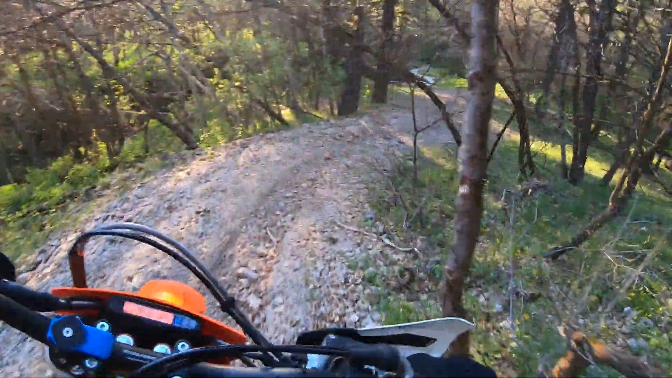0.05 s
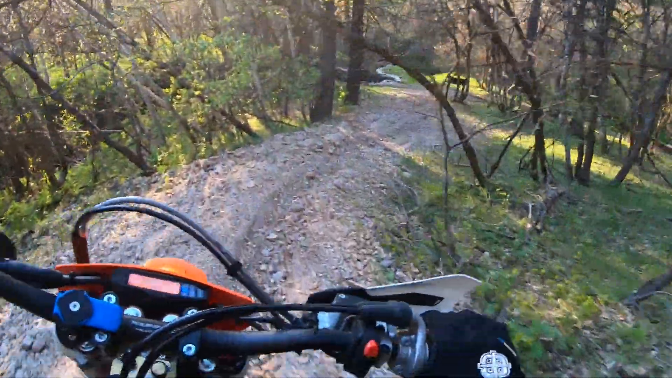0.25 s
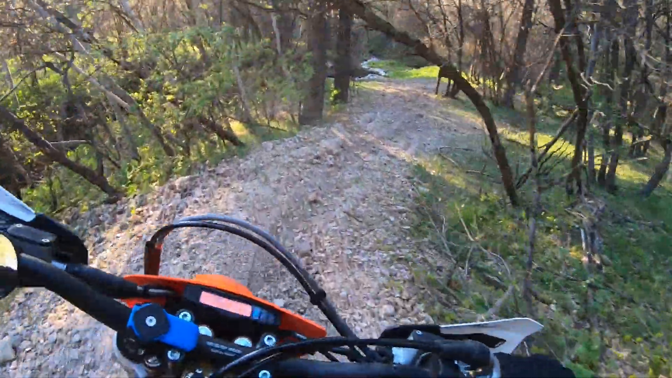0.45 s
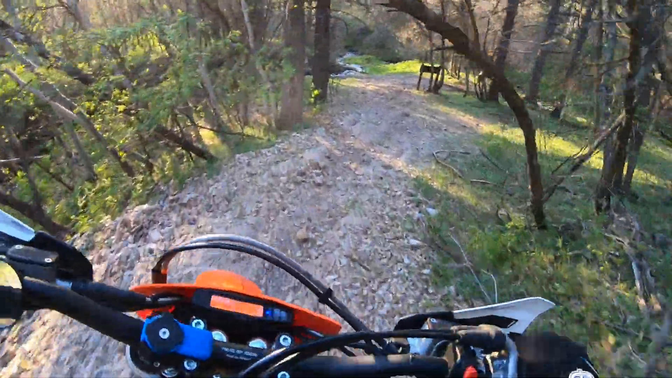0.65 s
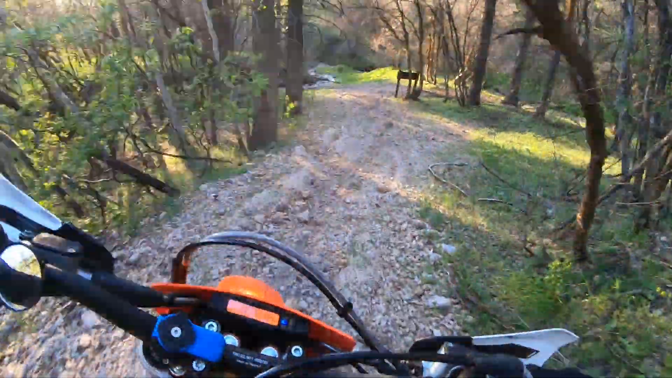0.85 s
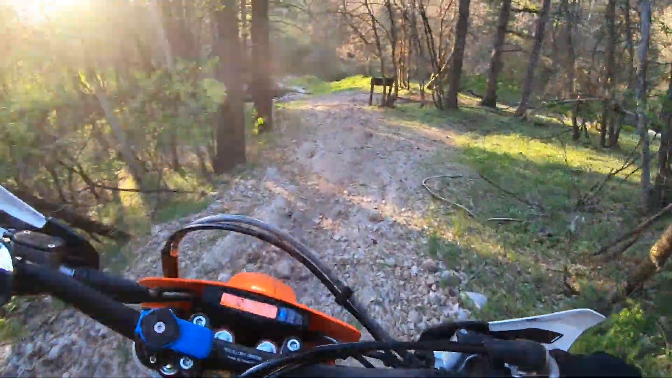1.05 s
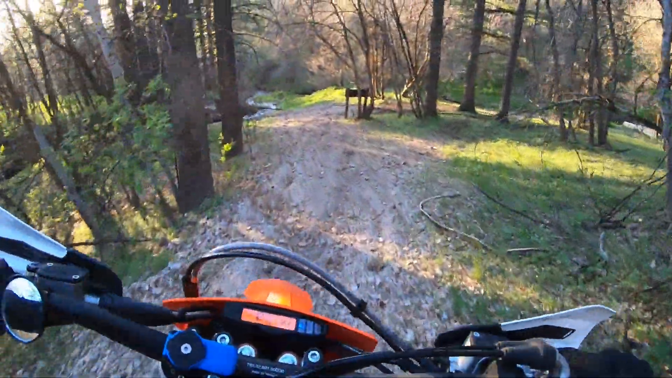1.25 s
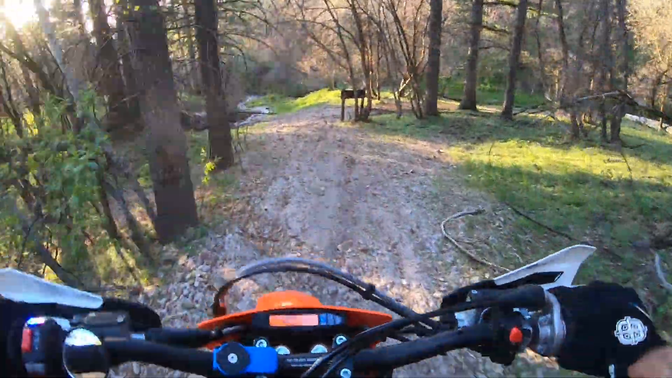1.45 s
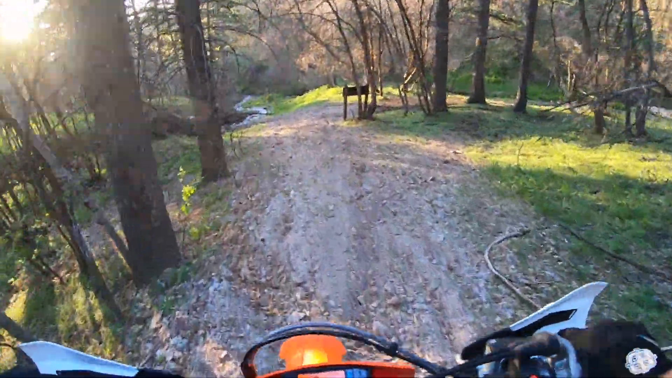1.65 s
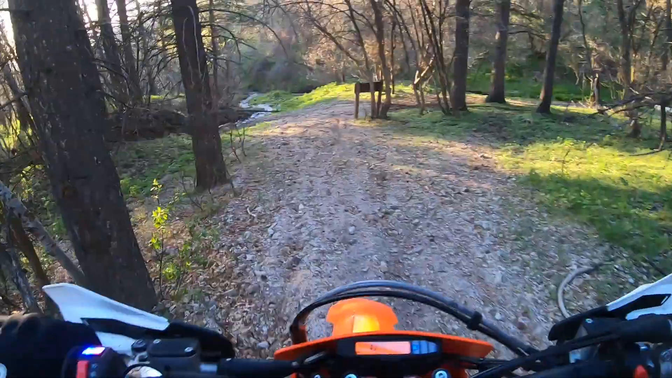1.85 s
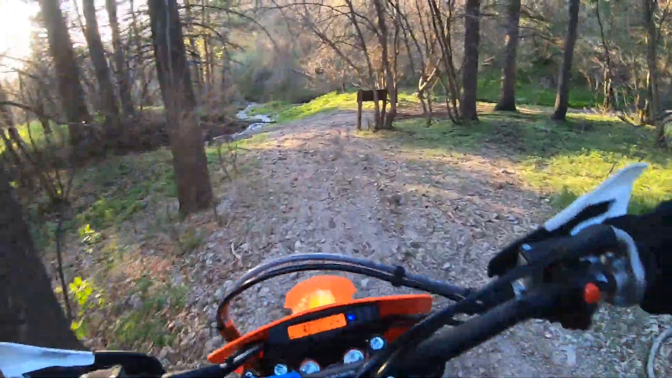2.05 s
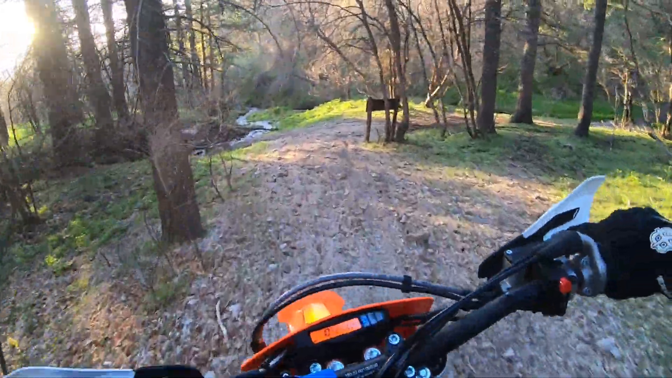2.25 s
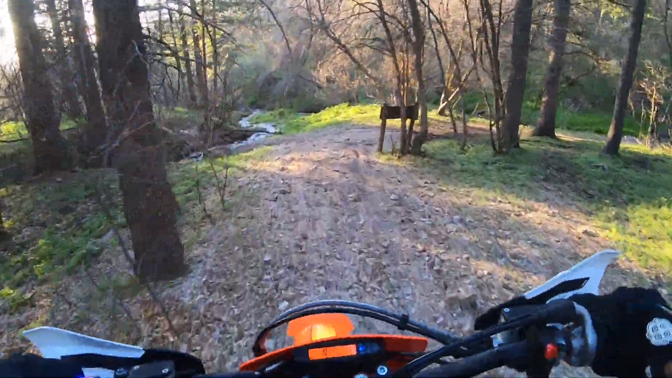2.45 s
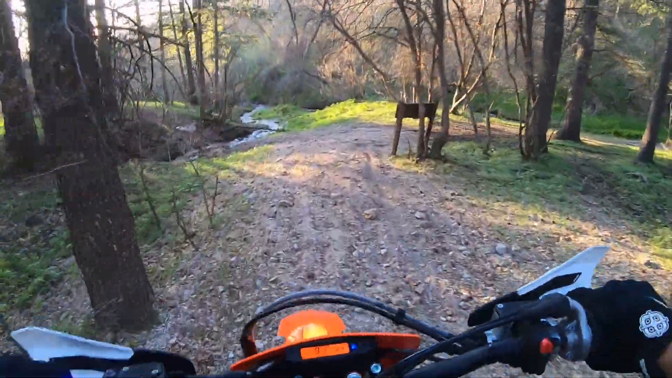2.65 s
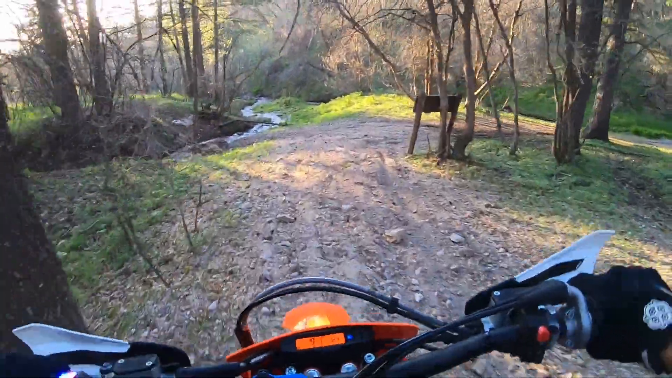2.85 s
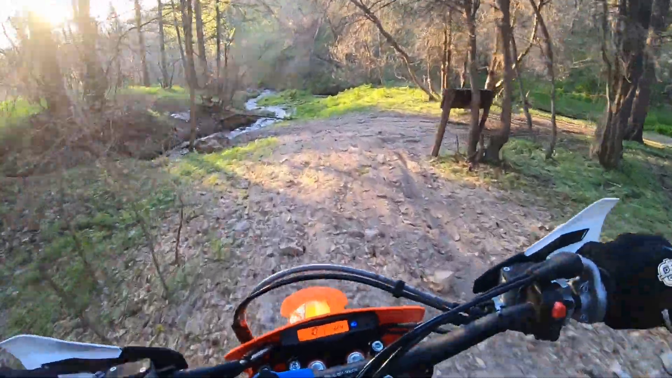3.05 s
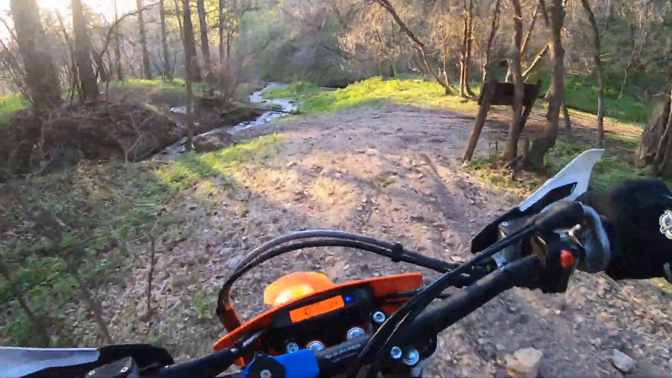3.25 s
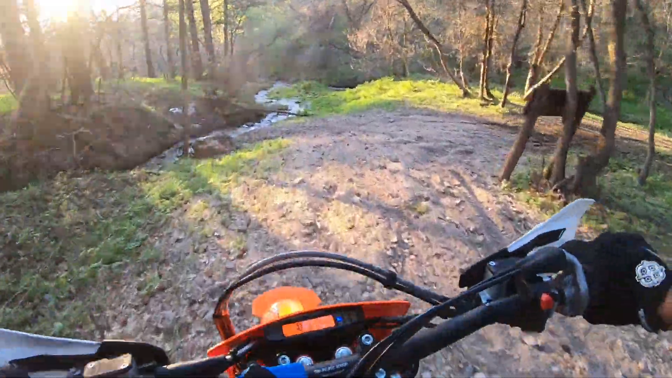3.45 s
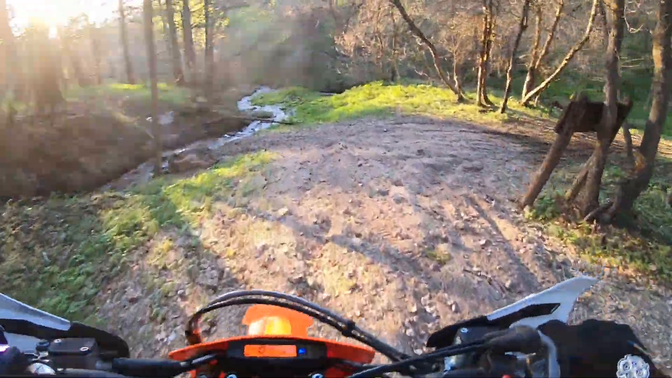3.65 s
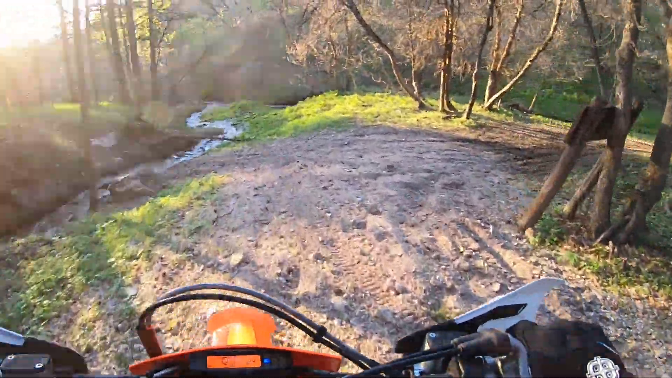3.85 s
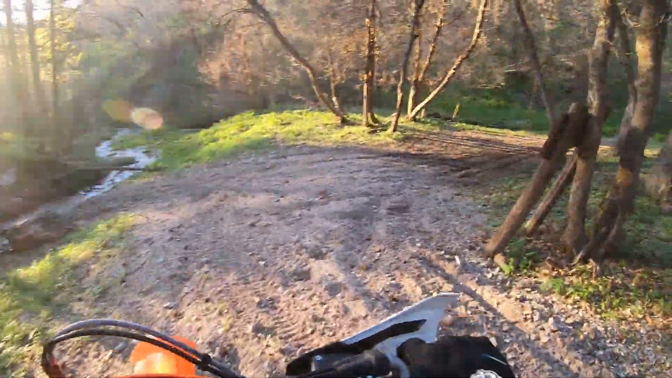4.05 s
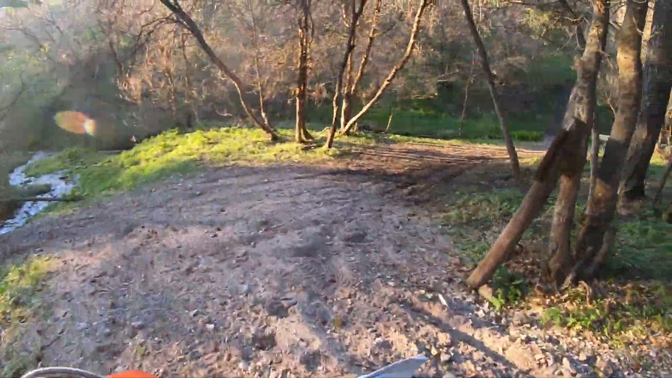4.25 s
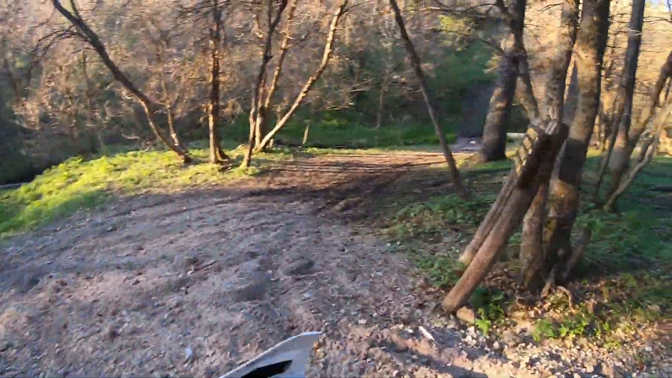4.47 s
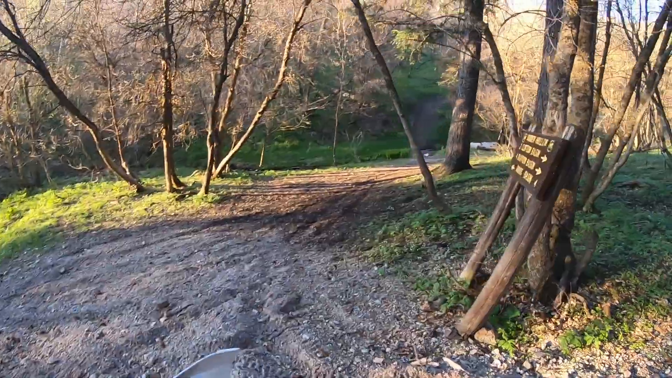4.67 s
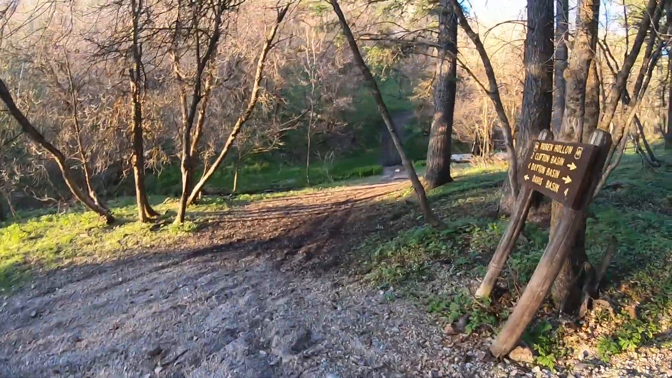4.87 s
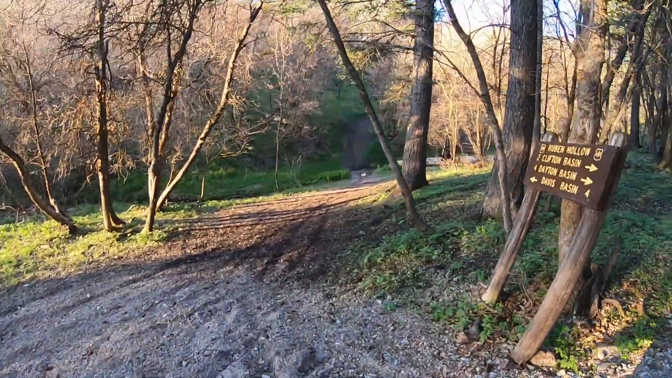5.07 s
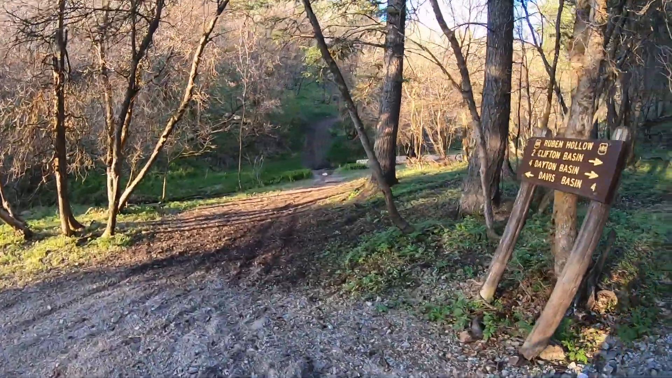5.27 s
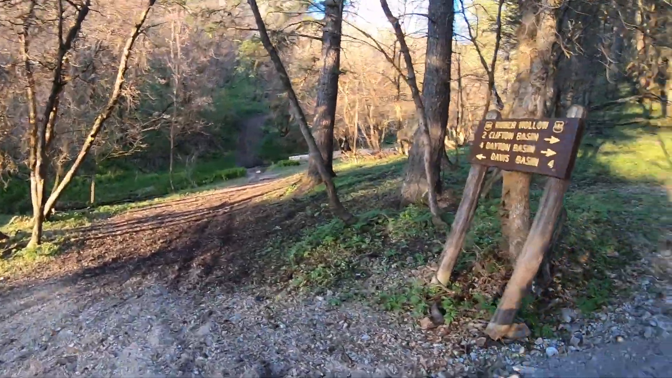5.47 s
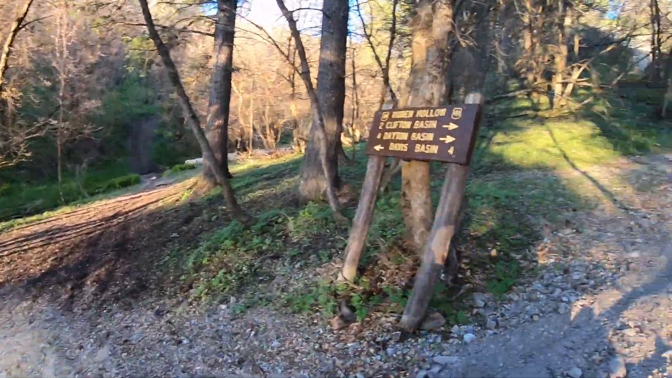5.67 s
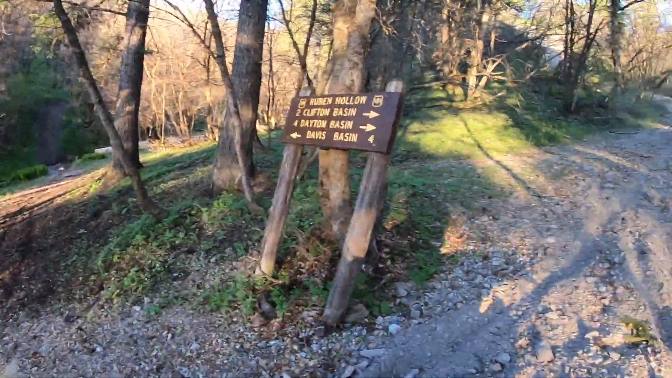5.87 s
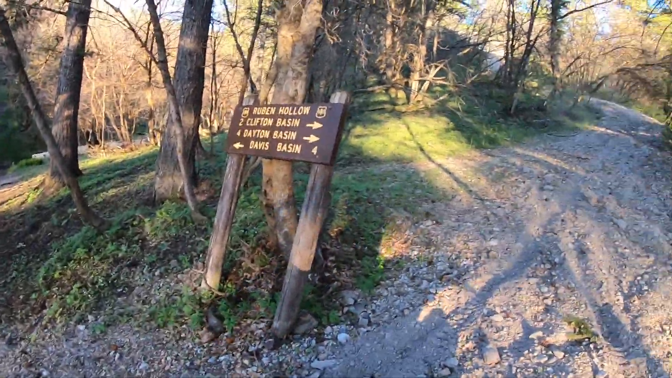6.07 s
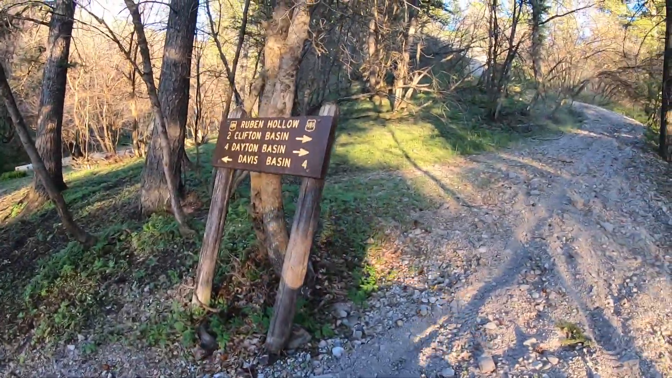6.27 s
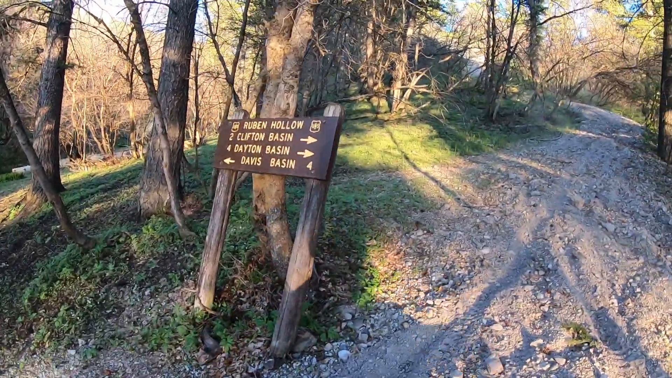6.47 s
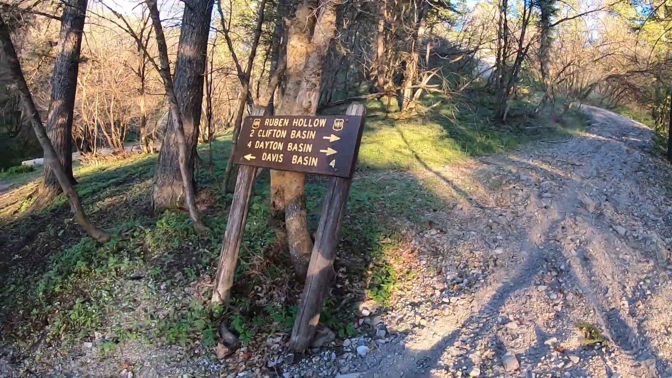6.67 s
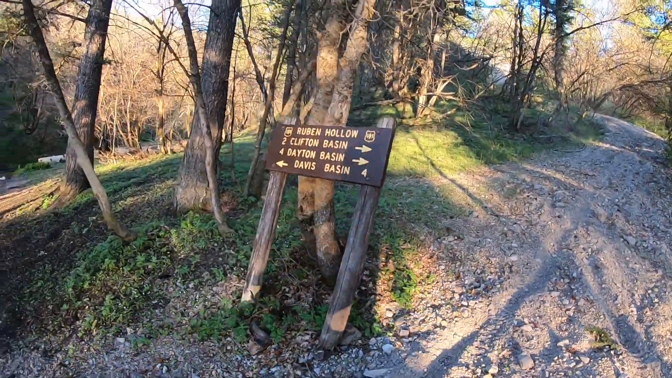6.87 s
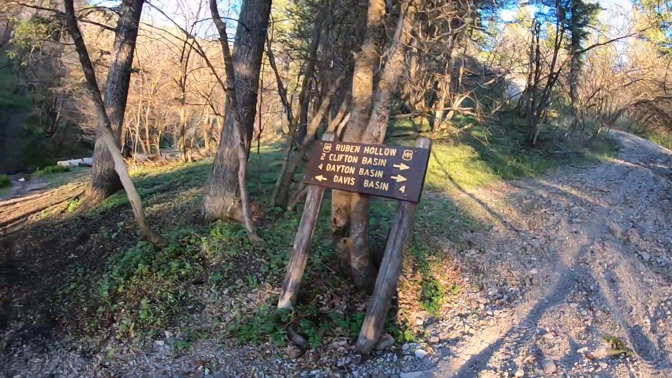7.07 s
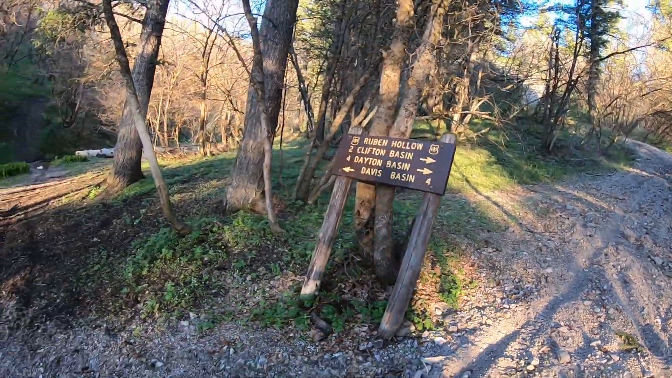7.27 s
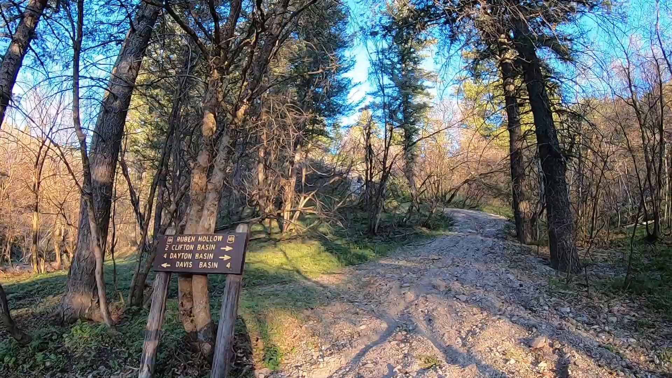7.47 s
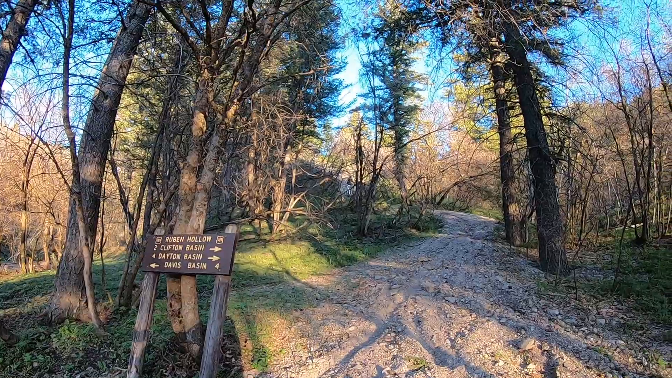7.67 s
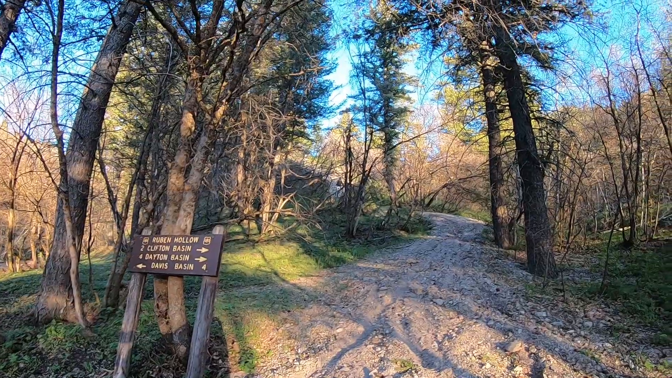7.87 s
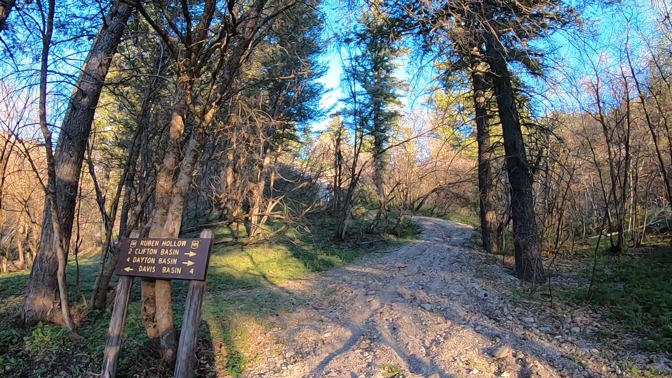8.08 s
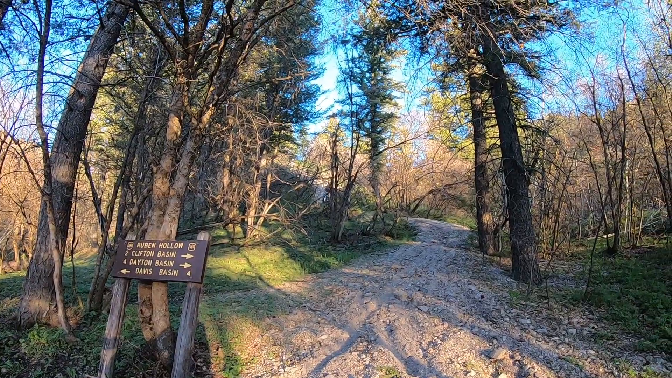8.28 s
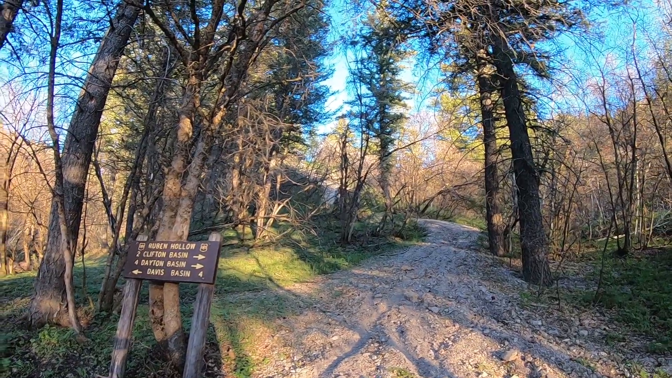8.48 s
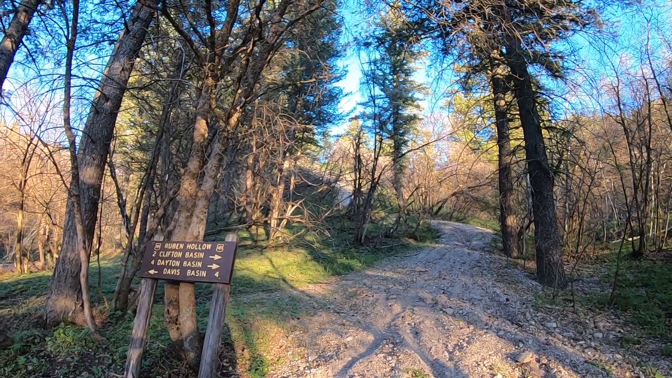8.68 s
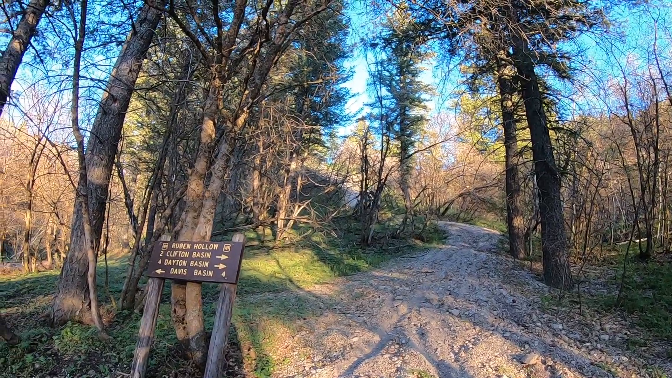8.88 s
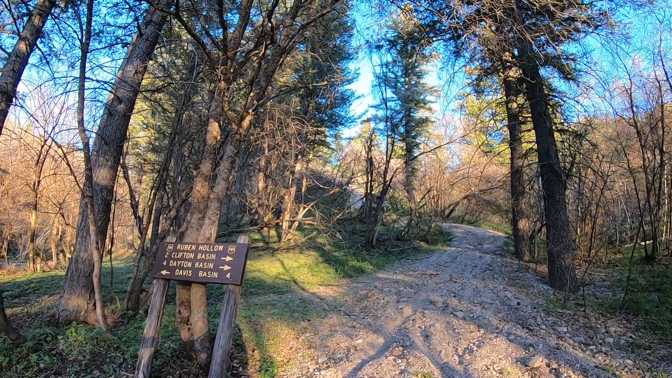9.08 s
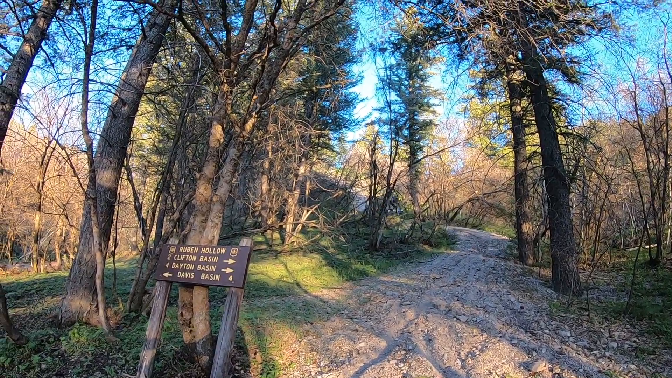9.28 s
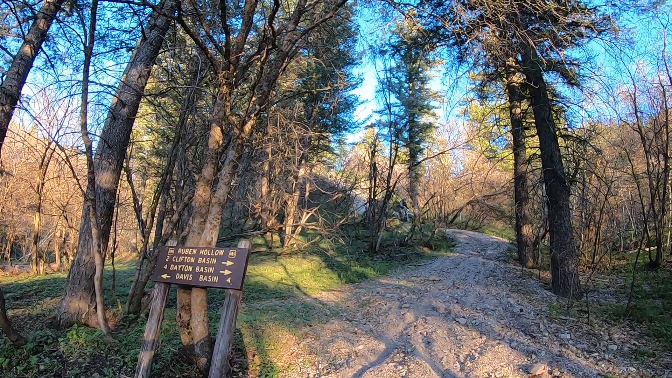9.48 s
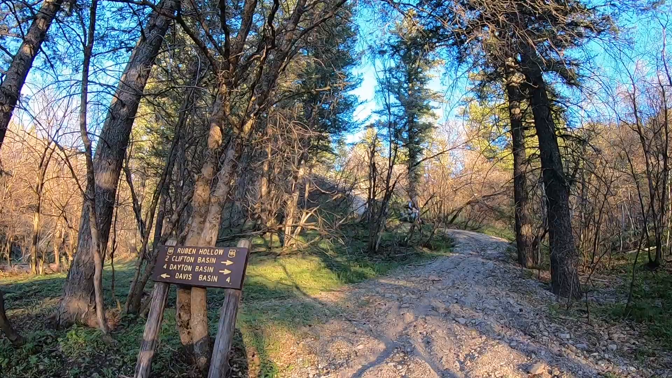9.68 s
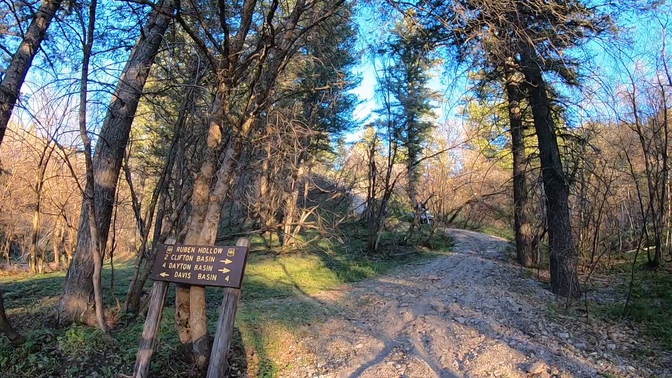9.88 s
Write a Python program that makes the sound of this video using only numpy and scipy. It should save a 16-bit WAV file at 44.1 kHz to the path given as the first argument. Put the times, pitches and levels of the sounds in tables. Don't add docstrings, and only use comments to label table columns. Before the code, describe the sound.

A single-cylinder four-stroke dirt bike heard from the rider's helmet, close and mono. The throttle is blipped repeatedly, thumps rising to hoarse barks and sagging to slow, popping chugs, while gravel crunches, gears whirr and stones knock the frame. It idles, revs sharply once more and slows. Then the sound opens to wide stereo outdoors: quiet, dull engine putter, hissing stream, tiny twig ticks and one hollow bump.

```python
import sys
import numpy as np
from scipy import signal
from scipy.fft import rfft, irfft, next_fast_len
from scipy.io import wavfile
from scipy.ndimage import uniform_filter1d

SR = 44100
rng = np.random.default_rng(int(sys.argv[2]) if len(sys.argv) > 2 else 0)


def inscribe(sig):
    pcm = np.round(np.clip(np.atleast_2d(sig).T, -1, 1) * 32767)
    wavfile.write(sys.argv[1], SR, pcm.astype(np.int16))


def field_ratio(decibels):
    return 10 ** (np.asarray(decibels, dtype=float) / 20)


N = 437913
TIME_S = np.arange(N) / SR
SWITCH_S = 7.4945


def in_time(rows):
    s, *columns = np.transpose(rows)
    return [np.interp(TIME_S, s, c) for c in columns]


def at_hz(points, hz):
    point_hz, point_db = np.transpose(points)
    return np.interp(np.log(hz), np.log(point_hz), point_db)


def swell(at_s, width_s):
    return np.exp(-((TIME_S - at_s) / width_s) ** 2)


def rms_one(x):
    return x / np.sqrt(np.mean(x ** 2) + 1e-20)


def noise():
    return rng.standard_normal(N)


def drift(rate_hz):
    r = np.exp(-80 * np.pi * rate_hz / SR)
    slow = signal.lfilter([1], [1, -2 * r, r * r], rng.standard_normal(N // 40 + 2002))[2000:]
    return np.interp(np.arange(N) / 40, np.arange(len(slow)), rms_one(slow))


def cut(x, hz, kind, order=2):
    return signal.sosfilt(signal.butter(order, hz, kind, fs=SR, output="sos"), x + 1e-18)


def ring(hits, hz, t60_s):
    r, w = field_ratio(-60 / (t60_s * SR)), 2 * np.pi * hz / SR
    return signal.lfilter([0, np.sin(w)], [1, -2 * r * np.cos(w), r * r], hits + 1e-18)


def late(x, delay_s):
    lag = max(int(delay_s * SR), 1)
    return np.concatenate([np.zeros(lag), x[:-lag]])


def clicks(s, level_db):
    out = np.zeros(N)
    out[np.clip((s * SR).astype(int), 0, N - 1)] = field_ratio(level_db)
    return out


def puff(train, hz):
    return cut(cut(train, hz, "low"), hz, "low") * SR / hz / 3


def pipe(pulse, trip_s, trips_db, dull_hz):
    out = pulse
    for trip_db in trips_db:
        pulse = cut(late(pulse, trip_s), dull_hz, "low")
        out = out + field_ratio(trip_db) * pulse
    return out


# hz, likeness (-1 to 1)
LIKENESS = [(60, 0.99), (170, 0.99), (460, 0.91), (1260, -0.11), (3470, 0.39), (9580, -0.48)]
# hz, left_minus_right_db
LEAN = [(60, -2.5), (210, 1), (760, -5.5), (2700, -4.5), (9580, -3.5)]


def banded_noise(spectrum, patchy_db, wide=False):
    size = next_fast_len(N, True)
    hz = np.maximum(np.arange(size // 2 + 1) * SR / size, 1)
    mid, side = rfft(rng.standard_normal((2, size))) * field_ratio(at_hz(spectrum, hz))
    if wide:
        alike = np.clip(at_hz(LIKENESS, hz), -1, 1)
        mid = np.sqrt(1 + alike) * mid + np.sqrt(1 - alike) * side * [[1], [-1]]
        mid = mid * field_ratio(at_hz(LEAN, hz) * np.array([[.5], [-.5]]))
    out, together, octave = 0, drift(3.0), np.log2(hz / 50)
    for k in range(9):
        band = irfft(mid * np.clip(1 - np.abs(octave - k), 0, 1), size)[..., :N]
        out = out + field_ratio(patchy_db * (together + drift(14))) * band
    return rms_one(out)


# s, level_db
STREAM = [(7.5, -37), (8.6, -37), (9.27, -37.5), (9.93, -35.5)]
# hz, density_db
WATER = [(60, -4), (130, -4), (323, -17), (910, -19), (1240, -17), (2140, -21.5), (3190, -24),
         (5120, -32.5), (8990, -31), (10000, -36.5), (13000, -64), (22000, -120)]


def stream():
    return field_ratio(in_time(STREAM)[0]) * banded_noise(WATER, patchy_db=0.82, wide=True)


def treble_air():
    air = cut(rng.standard_normal((2, N)), [9500, 13500], "band")
    return air + .2 * air[::-1]


# start_s, peak_db
FLICKS = [(0.0927, -60), (0.334, -48.5), (0.4813, -44.5), (0.8814, -56), (0.8967, -54.5), (1.0805, -57.5),
          (3.275, -48.5), (3.328, -56.5), (3.3643, -54.5), (4.0073, -66), (5.7414, -60), (6.1474, -57.5),
          (6.1857, -63), (6.363, -60), (6.4013, -67), (6.5116, -63)]


def grit_level():
    dust = field_ratio(-74.5 + 1.0 * (in_time(ROLL)[1] + 51.5) + 3.2 * drift(20))
    s, peak_db = np.transpose(FLICKS)
    fade = [1, -np.exp(-1 / (0.003 * SR))]
    return dust + signal.lfilter([1], fade, clicks(s, peak_db + 4.0) + 1e-18)


# centre_s, width_s, level_db
SIZZLE = [
    (.25, 0.57, -56.5),
    (4.48, .06, -63),
    (6.07, 0.055, -70),
    (7.0, 0.39, -59),
    (7.35, 0.11, -77),
]


def sizzle():
    level = sum(field_ratio(level_db) * swell(s, width_s) for s, width_s, level_db in SIZZLE)
    return level * field_ratio(1.5 * drift(25.0)) * rms_one(cut(noise(), [5500, 9500], "band"))


# centre_s, width_s, pitch_hz, level_db
CASE_WHIRR = [
    (8.1, .4, 1220, -61),
    (8.62, 0.17, 1620, -48),
    (9.5, 0.18, 1310, -50),
    (9.8, 0.16, 1400, -51.5),
    (9.75, 0.59, 3150, -53.5),
    (7.2, 0.29, 1100, -51),
]


def case_whirr():
    out = 0
    for s, width_s, hz, level_db in CASE_WHIRR:
        tone = rms_one(ring(ring(noise(), hz, 0.0064), hz, 0.0064))
        out = out + field_ratio(level_db + 3.7 * drift(12.0)) * swell(s, width_s) * tone
    return out


# s, drive_db (drive train speed), loose_db (loose stones under the tyres)
ROLL = [(0.0, -53.5, -42.5), (0.4, -46, -46), (0.95, -44, -44), (1.6, -43.5, -45.5), (2.7, -44, -49.5),
        (3.3, -40, -43), (3.6, -44, -41), (4.1, -42, -46.5), (4.56, -44, -49), (4.64, -38.5, -44.5),
        (4.85, -44, -50), (5.6, -49.5, -51.5), (6.1, -58, -45), (6.55, -49.5, -42.5), (6.9, -61, -49),
        (7.5, -45.5, -47.5)]


def rolling_levels():
    drive_db, loose_db = in_time(ROLL)
    revs = in_time(SPEED_CLOSE)[0] - 20
    return drive_db, loose_db, revs, 6 * swell(5.755, .022)


def strokes(s, sharpness_db):
    cycle = np.interp(TIME_S, s, np.arange(len(s)))
    slow, quick = np.cos(2 * np.pi * cycle), np.cos(4 * np.pi * (cycle - .1))
    return slow * sharpness_db[0] + quick * sharpness_db[1]


# hz, density_db
RUMBLE = [(40, -3.5), (150, 3.5), (300, 5.5), (520, -3), (700, -12), (1000, -11), (1300, -23.5),
          (2200, -48)]
# centre_s, width_s, crunch_db
SHOVES = [
    (.08, 0.22, 0),
    (.45, 0.044, 2.0),
    (1.65, 0.04, 5),
    (2.55, 0.082, -0.5),
    (7.2, .35, -5),
]


def tyre_rumble(loose_db, revs, rustle_db):
    level_db = -35 + 0.2459 * revs + 1.1 * rustle_db + 0.29 * (loose_db + 44.0)
    level_db = level_db + sum(db * swell(s, width_s) for s, width_s, db in SHOVES)
    return field_ratio(level_db + 6.0) * banded_noise(RUMBLE, patchy_db=.9)


def gear_whirr(s, drive_db, revs):
    teeth = noise() * field_ratio(strokes(s, (1.0, 3.0)) + 1.0 * drift(25))
    return field_ratio(drive_db + 0.45 * revs + 2.5) * rms_one(ring(ring(teeth, 1590, 0.0026), 1621, 0.021))


# hz, density_db
HISS = [(1120, -1.5), (1900, -1), (2040, -3), (2230, -4.5), (2730, -5), (3860, -9), (4440, -15),
        (5140, -16), (6380, -21.5), (7860, -19), (8610, -21.5), (10000, -54), (13000, -71), (22000, -120)]


def valve_hiss(s, hiss_db):
    throb_db = strokes(s, (2.0, 1.0)) * (0.5 + 1.0 * in_time(TAIL_PIPE)[0])
    hiss = banded_noise(HISS, patchy_db=1.43) * field_ratio(throb_db + 2.0 * np.tanh(drift(39.0)))
    return field_ratio(hiss_db + 3.5) * rms_one(hiss)


def gravel(drive_db, hiss_db, rustle_db):
    sizes = field_ratio(3.5 * np.minimum(rng.exponential(1, N), 4)) * rng.choice([-1, 1], N)
    born = rng.random(N) < 1200 * field_ratio(5.0 * np.tanh(drift(8))) / SR
    dealt = rng.integers(0, 10, N)
    grains = 0
    for k, hz in enumerate(np.geomspace(900, 4000, 10)):
        grains = grains + ring(sizes * born * (dealt == k), hz, 8.0 / hz)
    grains = field_ratio(-8.0) * rms_one(cut(grains, 4000, "low"))
    level_db = 0.78 * (drive_db + 42.5) + 0.71 * (hiss_db + 46.0) - 49.0 + 0.46 * rustle_db
    return field_ratio(level_db) * grains


def rolling(s):
    drive_db, loose_db, revs, rustle_db = rolling_levels()
    hiss_db = loose_db + 0.23 * revs + rustle_db
    out = tyre_rumble(loose_db, revs, rustle_db) + gear_whirr(s, drive_db, revs)
    return out + valve_hiss(s, hiss_db) + gravel(drive_db, hiss_db, rustle_db)


def knocks(rows, crack_s, cycles, crack_db, top_hz, bright_hz):
    grit = noise()
    dull, bright = cut(grit, [900, top_hz], "band"), cut(grit, bright_hz, "band")
    s, peak_db, pitch_hz, ring_db, bright_db = np.transpose(rows)
    fade = [1, -np.exp(-1 / (crack_s * SR))]
    out = signal.lfilter([1], fade, clicks(s, peak_db + crack_db) + 1e-18) * dull
    soft = signal.lfilter([.03], fade, clicks(s, peak_db + bright_db + 0.5) + 1e-18)
    out += signal.lfilter([1], fade, soft) * bright
    for at, level_db, hz in zip((s * SR).astype(int), peak_db + ring_db, pitch_hz):
        out[at:at + 2000] += field_ratio(level_db) * ring(np.arange(2000) == 0, hz, cycles / hz + 0.022)
    return out


# start_s, peak_db, pitch_hz, ring_db, bright_db
TWIGS = [
    (7.767, -43.5, 8800, 3, -11),
    (7.9048, -49, 7850, 5, -5),
]


def twigs():
    return knocks(TWIGS, crack_s=0.0025, cycles=4.3, crack_db=-24.0, top_hz=7500, bright_hz=[7500, 13000])


# start_s, peak_db, pitch_hz, ring_db, bright_db
BUMP = [
    (8.138, -19, 343, -5.5, -28),
]


def helmet_bump():
    bump = knocks(BUMP, crack_s=0.0036, cycles=3.1, crack_db=6.0, top_hz=1600, bright_hz=[1800, 3000])
    return cut(bump, 3000, "low")


# start_s, peak_db, pitch_hz, ring_db, bright_db
STONES = [(0.1994, -31.5, 861, -8, -21), (0.3496, -34, 710, -21, -19), (0.491, -35, 730, -17, -17),
          (0.5968, -41, 1620, 15, -29), (0.8975, -17.5, 1540, -3.5, -37), (1.3563, -32, 810, -23, -26),
          (2.509, -39, 1584, -18, -33), (2.821, -32.5, 1423, -26, -33), (2.8834, -33.5, 1600, 13.5, -42),
          (2.969, -33, 1623, 11, -33), (3.2755, -15, 720, 0, -43), (3.2775, -30, 610, 12, -37),
          (3.2836, -26, 850, 11, -35), (3.3164, -42, 1640, -8, -22), (3.3283, -17, 1657, 7.5, -35),
          (3.3392, -30, 1430, 13.5, -3), (3.3634, -37, 1740, -21, 14.5), (3.3695, -51, 830, -6, -13),
          (3.3952, -30, 1509, -13, -31), (3.907, -50, 1540, -9, -30), (4.0796, -28.5, 728, 0, -38),
          (4.587, -42.5, 1519, 1, -23), (5.7524, -35, 1013, 11, -37), (5.8361, -41, 973, -1, -27),
          (6.906, -39, 868, -6, -4)]


def frame_stones():
    return knocks(STONES, crack_s=0.0043, cycles=8.6, crack_db=5.5, top_hz=3520, bright_hz=[4550, 5250])


def turns(curve):
    s, rate = np.transpose(curve)
    grid_s = np.arange(s[0], s[-1] + .002, .001)
    count = (np.cumsum(np.interp(grid_s, s, rate)) - rate[0]) * .001
    return np.interp(np.arange(int(count[-1] + .2) + 1), count, grid_s)


# s, firings_per_s
SPEED_CLOSE = [(0.0212, 28.539), (0.1465, 18.536), (0.4091, 12.42), (0.5038, 14.314), (0.6172, 16.617),
               (0.7038, 21.379), (0.8055, 24.202), (0.933, 22.954), (1.1325, 17.697), (1.2538, 14.248),
               (1.3197, 16.442), (1.4038, 20.76), (1.5105, 24.859), (1.6204, 29.873), (1.6838, 30.005),
               (1.7541, 29.18), (1.8586, 27.731), (1.9965, 30.718), (2.0438, 29.355), (2.0989, 28.183),
               (2.2548, 24.992), (2.3138, 21.738), (2.3784, 24.468), (2.5018, 22.967), (2.7187, 14.828),
               (2.8038, 15.289), (2.8987, 20.043), (3.0614, 29.184), (3.1586, 30.994), (3.2966, 28.062),
               (3.4103, 27.199), (3.5467, 29.31), (3.6467, 30.745), (3.7852, 28.039), (3.8929, 26.118),
               (4.0587, 22.702), (4.2032, 18.355), (4.4665, 12.57), (4.6818, 14.623), (4.8953, 13.394),
               (5.1851, 14.37), (5.3859, 15.424), (5.6587, 14.128), (5.8579, 15.636), (6.0238, 15.332),
               (6.1045, 20.124), (6.1638, 24.303), (6.2255, 30.647), (6.3659, 26.434), (6.4773, 26.858),
               (6.6233, 28.204), (6.7337, 25.092), (6.9089, 21.237), (7.057, 19.805), (7.2841, 15.046),
               (7.4988, 13.862)]
# s, firings_per_s
SPEED_OPEN = [(7.55, 14.98), (8.185, 19.621), (8.188, 21.146), (9.2143, 14.904), (9.363, 19.578),
              (9.93, 23.77)]
# opens_s, shuts_s, bark_db, sag_db (added by shutting), crack_db
BLIPS = [(0.0, 0.18, -16.5, -1.5, -39), (0.396, 0.452, -26, 16, -40), (0.46, 0.507, -5, -9, -17),
         (0.503, 0.582, -12.5, 4, -38), (0.59, 0.95, -1.5, -4.5, -43), (1.275, 1.797, -2, 0.5, -33),
         (1.84, 2.149, -1, -3.5, -20.5), (2.224, 2.432, -1, -9, -41), (2.864, 3.284, -0.5, -3, -23),
         (3.387, 3.755, -3, -1.5, -21.5), (3.83, 3.91, -2, -6, -36), (4.365, 6.022, -17.5, 7, -38),
         (6.03, 6.68, -4.5, -4.5, -15), (6.677, 6.833, -17.5, 1, -27), (7.08, 7.13, -21.5, -4, -44),
         (7.198, 7.39, -17, -4.5, -39), (7.46, 7.503, -21.5, -3, -38)]
SHUT_BARK_DB, SHUT_CRACK_DB = -37., -36.5
THUMP_DB, LOAD_DUCK = -6.5, 0.8
LEAN_THUMP_DB, LEAN_BARK_DB = -0.5, -12.5
STUMBLE_S, STUMBLE_WIDTH_S, STUMBLE_DB = 2.776, 0.062, -8
OPEN_THUMP_DB, OPEN_DB_PER_RATE = -27, .5


def firings():
    s = np.concatenate([turns(SPEED_CLOSE), turns(SPEED_OPEN)])
    bark_db, crack_db = np.full(len(s), SHUT_BARK_DB), np.full(len(s), SHUT_CRACK_DB)
    since_shut, shut = np.arange(len(s)), np.ones(len(s), bool)
    for opens_s, shuts_s, level_db, sag_db, snap_db in BLIPS:
        held = (s >= opens_s) & (s < shuts_s)
        bark_db = np.where(held, level_db + sag_db * (s - opens_s) / (shuts_s - opens_s), bark_db)
        crack_db = np.where(held, snap_db, crack_db)
        shut = shut & ~held
        since_shut = np.where(s >= shuts_s, np.cumsum(s >= shuts_s), since_shut)
    lean = shut & (since_shut % 2 == 1)
    thump_db = THUMP_DB - LOAD_DUCK * np.maximum(bark_db + 4.0, 0) + LEAN_THUMP_DB * lean
    thump_db = thump_db + STUMBLE_DB * np.exp(-((s - STUMBLE_S) / STUMBLE_WIDTH_S) ** 2)
    open_db = OPEN_THUMP_DB + OPEN_DB_PER_RATE * (1 / np.gradient(s) - 18)
    thump_db = np.where(s < SWITCH_S, thump_db, open_db)
    return s, thump_db, bark_db + LEAN_BARK_DB * lean, crack_db + 1.5 * rng.standard_normal(len(s))


def engine_open(s, thump_db):
    s, thump_db = s[s > SWITCH_S], thump_db[s > SWITCH_S]
    luck = rng.standard_normal((len(s), 4))
    first = clicks(s - .009 + 0.002 * luck[:, 0], thump_db - 7.0 + 1.0 * luck[:, 1])
    second = clicks(s + 0.0051 + 0.0012 * luck[:, 2], thump_db + 0.95 * luck[:, 3])
    humps = puff(first + second, 191)
    humps = humps + field_ratio(-35.0) * ring(humps, 109.2, 0.034) + field_ratio(-37.5) * ring(humps, 110.0, 0.016)
    return field_ratio(4.5) * cut(humps, 53, "high") * field_ratio([[-.3], [.3]])


def piston_pump(s, rate, tail):
    cycle = np.interp(TIME_S, s, np.arange(len(s)))
    pump = field_ratio(-20.0) * np.cos(4 * np.pi * (cycle - .33)) + field_ratio(-25.0) * np.cos(8 * np.pi * (cycle - .08))
    return pump * np.interp(TIME_S, s, (rate / 30) ** 1.1 * (1 - .55 * tail))


BURBLE_HZ, BURBLE_DB, STANDING_DB, STANDING_S = 240, -16.5, -13, 6.7


def burble(s, rate, bark_db):
    pops = rng.random((len(s), 4))
    shut = np.maximum(np.clip((-21 - bark_db) / 4, 1e-3, 1), s < .45)
    level_db = BURBLE_DB + STANDING_DB * (s > STANDING_S) + 20 * np.log10(shut)
    stray = 0
    for k, sign in enumerate([1, -1]):
        stray = stray + sign * clicks(s + pops[:, k] / rate, level_db - 2.1 * pops[:, k + 2])
    return cut(puff(stray, BURBLE_HZ), 130, "high")


def crack(s, crack_db, luck_db):
    return cut(ring(clicks(s - .003, crack_db + 2 * luck_db[:, 0]), 490, 0.05), 820, "low")


def end_cap_snap(s, facing, crisp, effort, lead_s, luck_db):
    snap_db = -15.0 + 20 * np.log10(facing) - 8.0 * (1 - crisp) - 6.0 * effort + luck_db[:, 1]
    return cut(ring(clicks(s - .0052 - lead_s, snap_db), 355, .014), 520, "low")


def tail_spike(s, bark_db, tail, luck_db):
    pulse = puff(clicks(s - .0052, bark_db + 20 * np.log10(tail + 1e-6) + luck_db[:, 2]), 435)
    spike = pulse + field_ratio(-36.0) * ring(pulse, 300, .03) + field_ratio(-34.0) * ring(pulse, 480, 0.018)
    spike = spike + field_ratio(-22.0) * ring(pulse, 817, 0.032) + field_ratio(-26.5) * ring(pulse, 1210, .008)
    spike = cut(pipe(spike, 0.00643, [-3.0], dull_hz=550), 66, "high", order=1)
    spike = spike - .6 * cut(spike, [170, 240], "band", order=1)
    rasp = puff(clicks(s - .0065, bark_db + 8.0 * np.log10(tail + 1e-12) + 4.0 * luck_db[:, 0]), 90)
    spike = spike + field_ratio(-47.5) * rasp * cut(noise(), [900, 5000], "band", order=1)
    return spike + field_ratio(-56.0) * rasp * rms_one(ring(noise(), 1750, 0.006))


PIPE_HZ, PIPE_HZ_PER_RATE, PIPE_HZ_PER_GAIN = 284.6, 0.72, 0.31


def header_bark(s, rate, bark_db, tail, effort, glow, luck_db, chance):
    gain = np.clip(np.gradient(uniform_filter1d(rate, size=3), s), -30, 30)
    pitch_hz = PIPE_HZ + PIPE_HZ_PER_RATE * (rate - 24) + PIPE_HZ_PER_GAIN * gain + 9.4 * chance
    pitch_hz = np.clip(pitch_hz + 20.0 * tail, 220, 340)
    echo_loss_db = 7.0 + 5.8 * (1 - effort) + 6.7 * glow
    bark = 0
    for hz in range(220, 341, 20):
        share = np.clip(1 - np.abs(pitch_hz - hz) / 20, 1e-6, 1)
        level_db = bark_db + 20 * np.log10(share) - 10.0 * tail
        sharp = clicks(s - .0056, level_db + luck_db[:, 2])
        echo = clicks(s - .0056 + 2 / hz, level_db - echo_loss_db + luck_db[:, 1])
        bark = bark + cut(ring(puff(sharp + echo, 304), hz, 0.02), 140, "high")
    return bark


# delay_cold_s, delay_hot_s, width_s, height_cold, height_hot
RETURNS = [
    (0.0, 0.00037, 0.0011, 0.66, 0.6),
    (.0024, 0.0026, 0.0011, -1, -0.38),
    (.0053, 0.0055, 0.0013, -0.55, -0.57),
    (.0085, 0.0089, 0.0021, 0.88, 1.0),
    (0.0126, 0.011, 0.0018, -0.52, -1.18),
    (0.024, .0160, 0.0024, 0.63, 0.73),
    (0.019, 0.022, 0.0028, -0.5, 0.15),
    (0.034, 0.031, .004, -0.21, -0.064),
    (.042, .040, 0.0033, 0.24, -0.22),
]
COAST_BLUR, COAST_FADE = 0.49, 0.37
GLOW_HURRY, GLOW_LOSS = 0.15, 0.37


def exhaust_waves(s, level_db, heat, crisp, glow, lead_s):
    out, time_s = np.zeros(N + 4000), np.arange(-400, 2600)[:, None] / SR
    cold_s, hot_s, width_s, cold, hot = np.transpose(RETURNS)
    wave = np.arange(len(RETURNS))
    luck = rng.standard_normal((len(s), 2, len(RETURNS)))
    burns = zip((s * SR).astype(int), field_ratio(level_db), heat, crisp, glow, lead_s, luck)
    for at, gain, warm, sharp, red, lead, (early, strong) in burns:
        delay_s = cold_s + warm * (hot_s - cold_s)
        delay_s = delay_s * (1 + 0.05 * (1.25 - sharp) * np.tanh(early))
        delay_s = delay_s * (1 - GLOW_HURRY * red * (wave > 2))
        blur = 1 + COAST_BLUR * (1 - sharp) * (wave < 3)
        height = (cold + warm * (hot - cold)) * field_ratio(1.6 * (1.6 - sharp) * np.tanh(strong)) / blur
        height = height * (1 - GLOW_LOSS * red * ((wave == 2) | (wave == 3)))
        height = height * (1 - COAST_FADE * (1 - sharp) * (wave > 4))
        delay_s = delay_s * (1 + .3 * (blur - 1)) - lead * (wave == 0)
        out[at:at + 3000] += gain * np.exp(-.5 * ((time_s - delay_s) / (width_s * blur)) ** 2) @ height
    return out[400:N + 400]


COAST_HEAT = 0.42


def gas_heat(rate, bark_db, effort, tail):
    fast = np.clip((rate / 30 - .55) / .3, 0, 1)
    warm = np.maximum(effort * (0.53 + 0.4 * fast), COAST_HEAT * fast)
    tail_heat = tail * fast * np.clip((bark_db + 26.5) / 9.6, 0, 1)
    return np.clip(np.maximum(warm, tail_heat), 0, 1)


# s, share (0-1)
TAIL_PIPE = [(0, 0), (5.3, 0), (6.03, .2), (6.15, 1), (6.73, 1), (6.9, 0)]
# s, share (0-1)
FACING = [(0, 0), (4.5, .15), (5.3, .4), (5.7, 1), (7.5, 1)]
GLOW_FROM_RATE, GLOW_SPAN_RATE = 26.9, 4.0
TURN_LEAD_S = 0.0021


def engine_close(s, thump_db, bark_db, crack_db):
    luck = rng.standard_normal((len(s), 4))
    luck_db, chance = .7 * luck[:, :3], luck[:, 3]
    rate = 1 / np.gradient(s)
    effort = np.clip((bark_db - thump_db + 5.0) / 4.7, 0, 1)
    crisp = np.clip((bark_db + 30.0) / 12.6, 0, 1)
    tail = np.interp(s, *np.transpose(TAIL_PIPE))
    facing = np.clip(np.interp(s, *np.transpose(FACING)), 1e-3, 1)
    heat = gas_heat(rate, bark_db, effort, tail)
    glow = effort * (1 - tail) * np.clip((rate - GLOW_FROM_RATE) / GLOW_SPAN_RATE, 0, 1)
    lead_s = TURN_LEAD_S * facing * (1 - effort)
    level_db = thump_db + 0.064 - 1.2 * effort + 0.18 * tail + luck_db[:, 0]
    thump = exhaust_waves(s - .0038 + .0002 * chance, level_db, heat, crisp, glow, lead_s)
    bark = header_bark(s, rate, bark_db, tail, effort, glow, luck_db, chance)
    body = thump + field_ratio(-25.0) * bark + burble(s, rate, bark_db)
    body = body - 0.9 * cut(body, [395, 446], "band", order=1)
    edges = crack(s, crack_db, luck_db) + end_cap_snap(s, facing, crisp, effort, lead_s, luck_db)
    return body + field_ratio(4.0) * tail_spike(s, bark_db, tail, luck_db) + edges + piston_pump(s, rate, tail)


def scene():
    s, thump_db, bark_db, crack_db = firings()
    close = engine_close(s, thump_db, bark_db, crack_db) + rolling(s) + frame_stones() + sizzle()
    close = cut(close, 9300, "low", order=6)
    close = signal.sosfiltfilt(signal.butter(2, 30, "high", fs=SR, output="sos"), close)
    air = treble_air()
    close = close + grit_level() * air
    open_view = engine_open(s, thump_db) + stream() + twigs() + helmet_bump() + field_ratio(-72.0) * air
    share = np.clip((TIME_S - SWITCH_S) / .0012, 0, 1)
    return (1 - share) * close + case_whirr() + share * open_view


def band_limit(x):
    return signal.sosfilt(signal.butter(12, 15700, fs=SR, output="sos"), x)


def record(dry):
    mix = .8 * np.tanh(dry / .8)
    return band_limit(mix)


dry = scene()
out = record(dry)
inscribe(out)
```